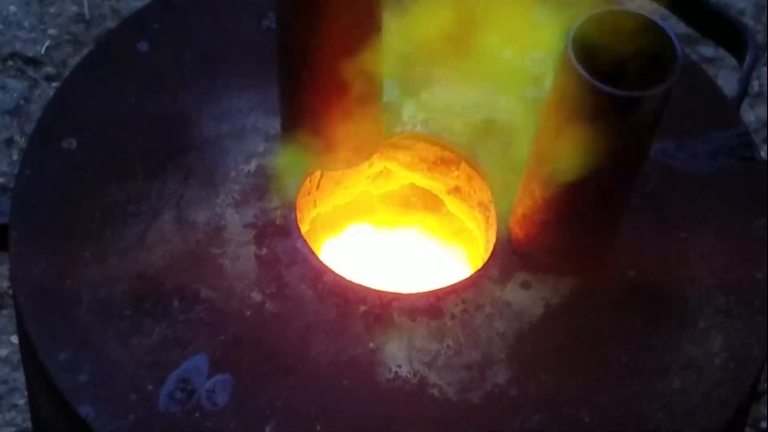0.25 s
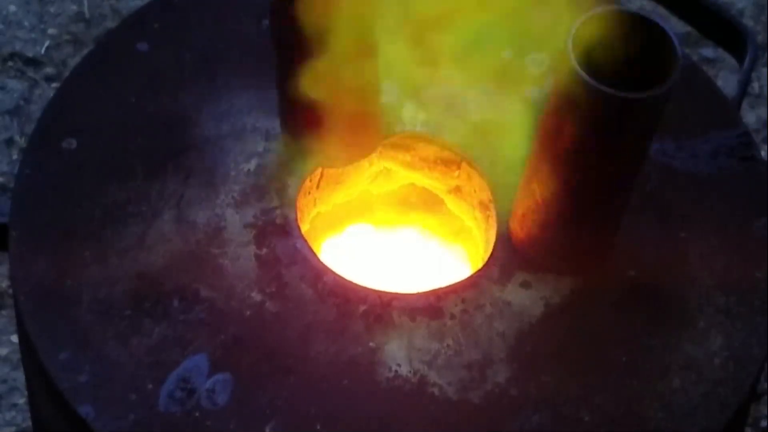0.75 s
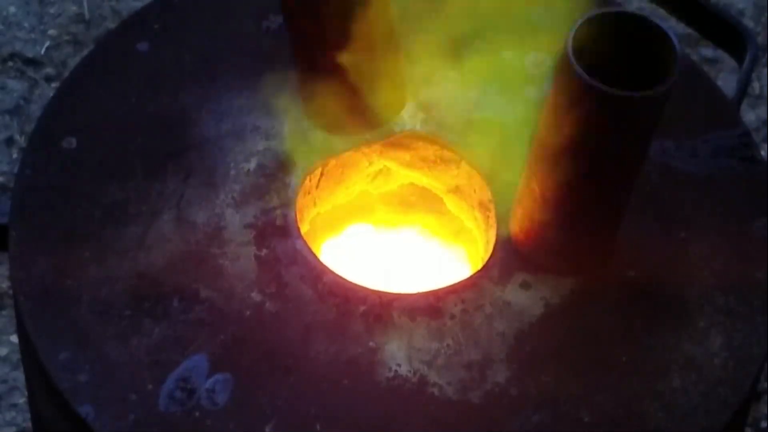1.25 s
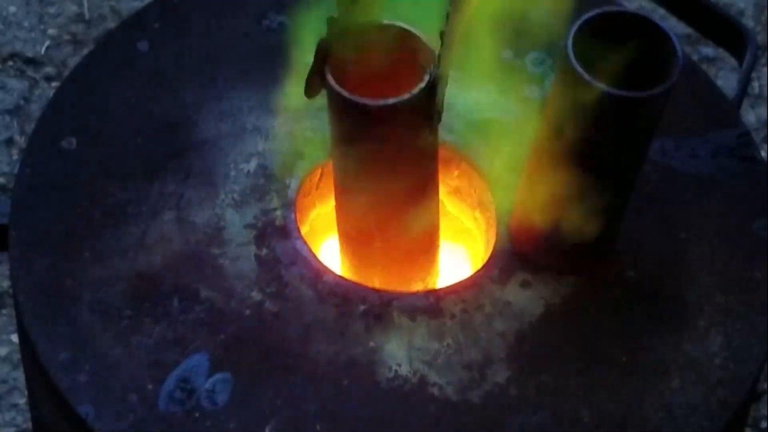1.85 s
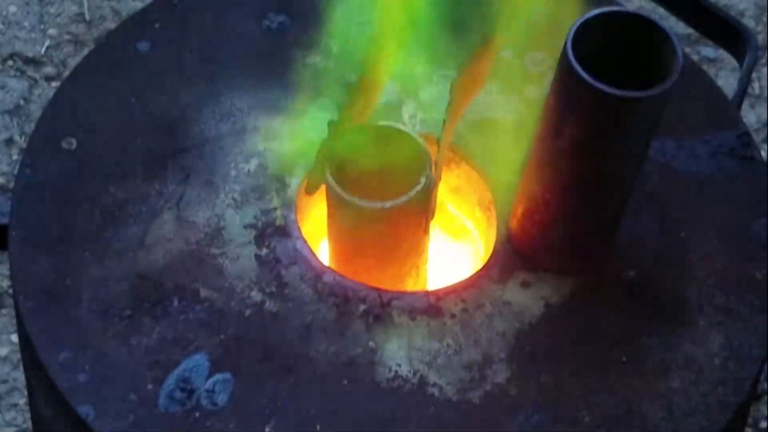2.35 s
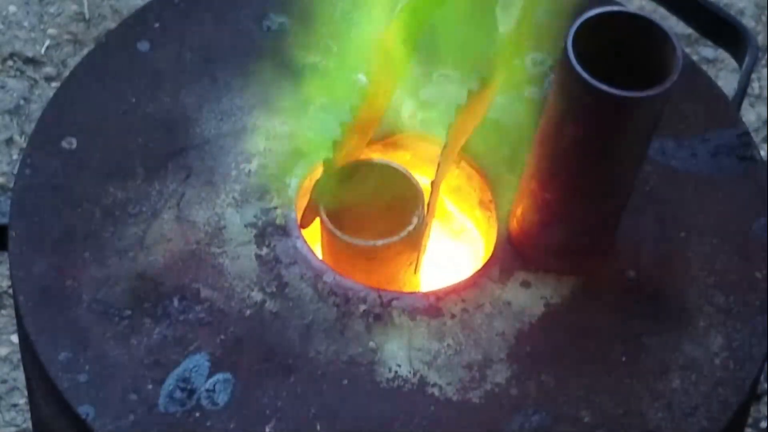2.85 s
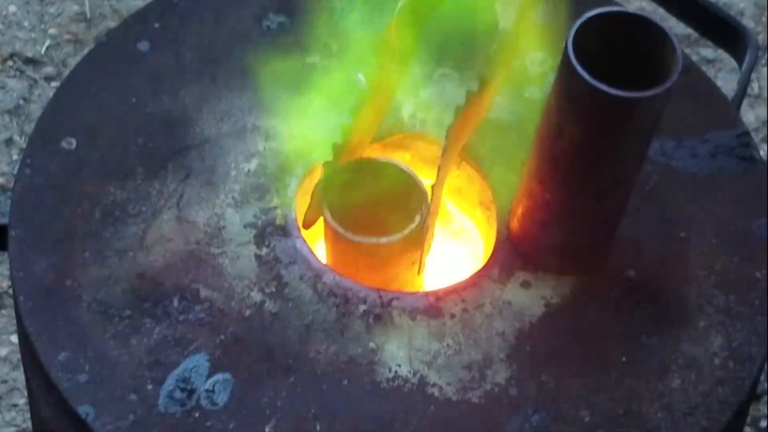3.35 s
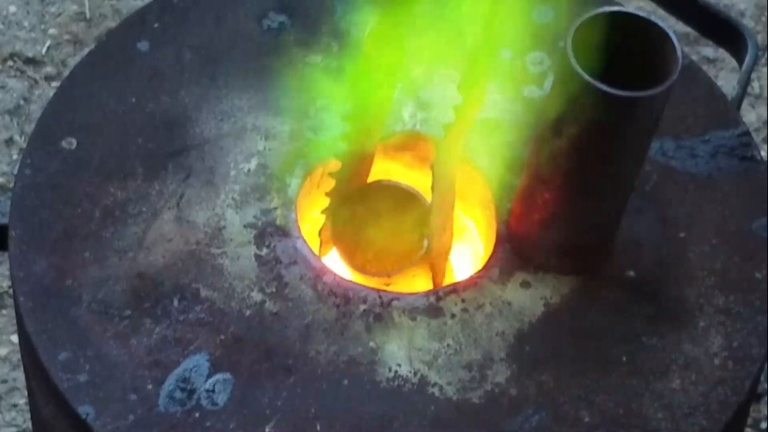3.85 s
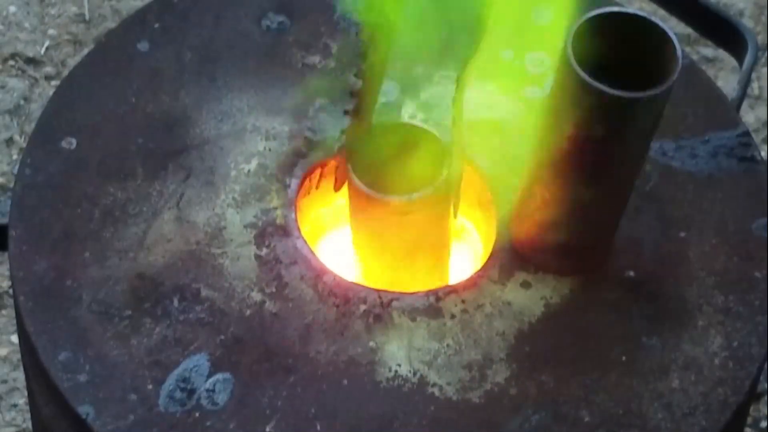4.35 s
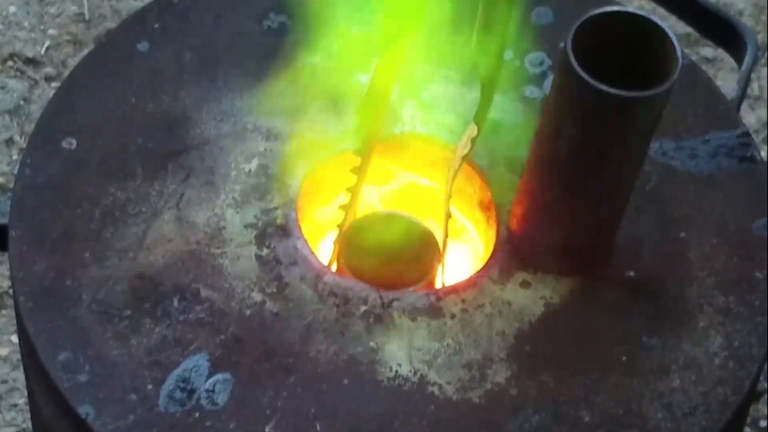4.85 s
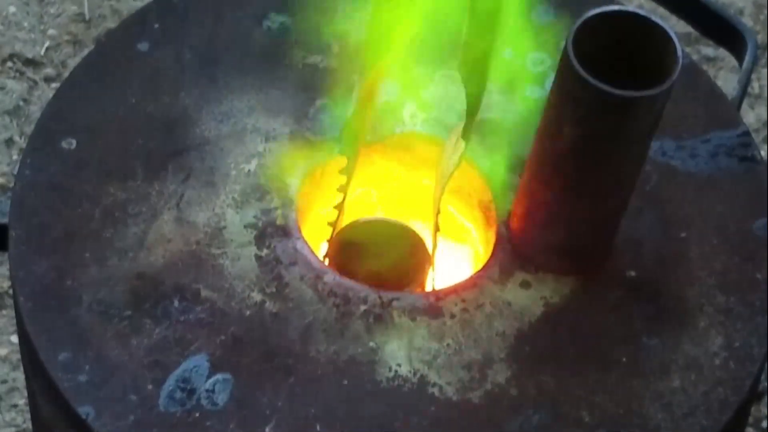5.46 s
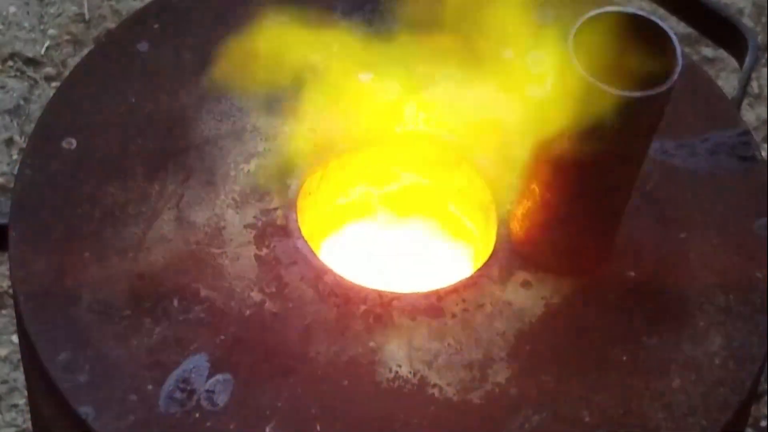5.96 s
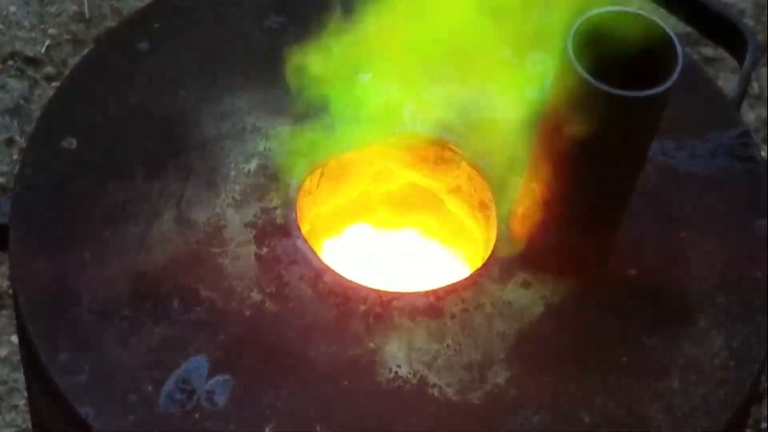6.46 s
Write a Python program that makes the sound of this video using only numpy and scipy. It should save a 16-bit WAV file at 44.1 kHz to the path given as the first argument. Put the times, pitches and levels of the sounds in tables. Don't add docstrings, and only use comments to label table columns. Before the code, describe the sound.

Deep, hollow flame rumble from a metal-melting furnace, wavering slightly as a pipe is lowered in, with a barely audible gas hiss above it.

```python
import sys
import numpy as np
from scipy import signal
from scipy.fft import rfft, irfft, next_fast_len
from scipy.io import wavfile
from scipy.ndimage import uniform_filter1d

SR = 44100
rng = np.random.default_rng(int(sys.argv[2]) if len(sys.argv) > 2 else 0)


def amp(db):
    return 10 ** (np.asarray(db, float) / 20)


def write(x):
    x = np.atleast_2d(x).T
    wavfile.write(sys.argv[1], SR, np.round(np.clip(x, -1, 1) * 32767).astype(np.int16))


N = 295911

# start_s, pressure_db
PRESSURE = [(0, -0.5), (.35, 0), (.9, 0), (1.45, -2), (1.8, -0.5), (2.1, 0), (2.5, 1.5), (2.85, 0),
            (3.5, 2.5), (3.8, -0.5), (4.15, 3.5), (4.5, 0.5), (4.95, 2), (5.2, 0), (5.85, 1), (6.2, 1.5),
            (6.5, 0), (6.7, 3)]
# start_s, depth_0_to_1
PIPE_DEPTH = [
    (0, 0.27),
    (1.2, 0.9),
    (1.8, 0.92),
    (5.7, 0.8),
    (6.05, 0.2),
    (6.7, 0),
]
# start_s, peak_db, pitch_hz
POPS = [(0.195, -48, 580), (0.509, -38, 563), (1.257, -34, 536), (1.309, -42, 530), (2.127, -39.5, 538),
        (2.235, -42, 548), (2.44, -40.5, 780), (3.121, -45, 506), (3.267, -44, 757), (4.701, -40, 487),
        (4.758, -43, 545), (6.456, -42, 570), (6.594, -41, 538)]


def read(points, hz, column=1):
    table = np.transpose(points)
    return np.interp(np.log(hz + 1), np.log(table[0] + 1), table[column])


def evened(x):
    return x / np.sqrt(np.mean(np.abs(x) ** 2) + 1e-20)


def curve(rows):
    return np.interp(np.arange(N) / SR, *np.transpose(rows))


def swells(rows):
    coarse_s = np.arange(0, N + 50, 50) / SR
    center_s, db, length_s = np.transpose(rows)
    bells = np.exp(-(2 * (coarse_s[:, None] - center_s) / length_s) ** 2)
    return np.interp(np.arange(N) / SR, coarse_s, bells @ db)


def flutter(depth_db, samples):
    wobble = rng.standard_normal(N)
    for _ in range(2):
        wobble = uniform_filter1d(wobble, int(samples))
    return amp(depth_db * evened(wobble))


def steadied(x, size, share):
    swing = uniform_filter1d(uniform_filter1d(x.mean(0) ** 2, size=size), size=size)
    x = x / (swing + 0.57) ** share
    return x / np.sqrt(np.mean(x.mean(0) ** 2))


def lifted(x, low_hz, high_hz, db):
    sos = signal.butter(2, [low_hz, high_hz], "band", fs=SR, output="sos")
    return x + signal.sosfiltfilt(sos, x) * (amp(db) - 1)


def resonances(modes, hz):
    mode_hz, width_hz, left_db, right_db = np.transpose(modes)
    shape = 1 / (1 + (2 * (hz[:, None] - mode_hz) / width_hz) ** 2) ** 1.333
    return np.array([shape @ amp(2 * left_db), shape @ amp(2 * right_db)])


def sided(points, hz):
    # pitch_hz, left_minus_right_db
    left_lean = [(60, 2.5), (110, -6.5), (200, -4.5), (380, -1), (700, -3), (1290, 0.5), (2380, -6),
                 (4400, -5), (8120, 5), (15000, -21)]
    lean_db = read(left_lean, hz) * np.array([[.5], [-.5]])
    return amp(2 * (read(points, hz) + lean_db))


def turbulence(power, size, patchy_db, flicker_db, patch_hz, patch_s):
    # pitch_hz, likeness_0_to_1, left_lead_rad
    port_likeness = [(40, .9, 0.5), (70.5, 1, -0.5), (201, 0.99, -0.15), (400, 1, -0.25), (457, 1, -0.5),
                     (508, 0.87, 0.7), (537, 0.95, -0.5), (600, 0.85, 0), (785, 0.95, 0.23), (930, 0.84, 0),
                     (1027, 0.2, -0.2), (1095, 1, -1), (1132, 0, -2.5), (1200, .68, -1), (1300, 0.4, -1),
                     (1380, 0.2, -0.7), (1440, .42, -1.5), (1520, 0.6, -0.2), (1575, 0.8, .5),
                     (1660, 0.92, 0.7), (1770, 0.6, 0.6), (1860, .4, -1.5), (1900, 0.2, -1.5), (2150, 0, -2.5),
                     (2270, .55, -3.5), (2364, .5, -6), (2450, 0.3, -6), (2580, 0.4, -5), (2730, 0, -6),
                     (2820, .12, -4), (2970, 0.47, -3), (3200, 0.46, -2),
                     (4000, 0.12, -2.5), (5760, 0.42, -5), (6130, .1, -2.5), (7600, 0.79, -2.5),
                  (9100, .15, -2.5), (10780, 0.97, 2), (12130, .3, 8), (14800, .45, 2.5),
                  (15500, 0.16, 3.5)]
    ports = port_likeness
    hop, hz = size // 4, np.fft.rfftfreq(size, 1 / SR)
    a, b, c, d, patches = rng.standard_normal((N // hop + 5, len(hz), 5), dtype=np.float32).T
    wide_bins = max(int(patch_hz * size / SR), 1)
    long_frames = max(int(patch_s * SR / hop), 1)
    for _ in range(2):
        patches = uniform_filter1d(uniform_filter1d(patches, wide_bins, axis=0), long_frames, axis=1)
    flicker = evened(uniform_filter1d(rng.standard_normal(a.shape[1]), long_frames))

    same = np.clip(read(ports, hz), 0, 1)[:, None].astype(np.float32)
    lead = np.exp(1j * read(ports, hz, column=2))[:, None].astype(np.complex64)
    right = a + 1j * b
    left = lead * (same * right + np.sqrt(1 - same ** 2) * (c + 1j * d))
    z = np.array([left, right])
    z *= np.sqrt(power(hz))[:, :, None] * amp(patchy_db * evened(patches) + flicker_db * flicker)
    out = signal.istft(z, nperseg=size, noverlap=size - hop)[1][:, :N]
    return out / np.sqrt(np.mean(out.mean(0) ** 2))


def tongs():
    # start_s, peak_db, center_hz, width_hz, t60_s
    ticks = [(5.34, -72, 15000, 3500, .15), (5.345, -73.5, 3980, 1600, 0.22), (5.34, -72, 7760, 1800, 0.19),
             (5.51, -69, 13700, 3000, .3), (5.748, -71, 4000, 820, .12), (5.762, -69, 3200, 300, .06),
             (5.76, -71, 6550, 250, .08), (5.762, -71, 5800, 1200, .06), (5.833, -61, 12900, 3500, .05),
             (5.785, -79, 4100, 200, .3), (5.86, -75, 4520, 160, .6), (6.8, -77, 4520, 160, .3),
             (5.5, -79, 4100, 200, .3), (6.22, -62, 12500, 3000, .06), (6.612, -72, 3300, 1100, .3),
             (6.63, -68.5, 2300, 700, 0.46), (8.2, -63, 2500, 1300, 0.44), (6.618, -63, 6860, 2500, .04)]
    out, t = np.zeros(N), np.arange(8000) / SR
    for start_s, peak_db, hz, width_hz, t60_s in ticks:
        pole = np.exp(-np.pi * width_hz / SR)
        grit = rng.standard_normal(len(t)) + 1j * rng.standard_normal(len(t))
        for _ in range(2):
            grit = signal.lfilter([1], [1, -pole], grit)
        band = evened((grit * np.exp(2j * np.pi * hz * t)).real)
        tick = amp(peak_db + 1.5 - 60 * t / t60_s) * band * np.minimum(t / 0.007, 1)
        part = out[round(start_s * SR):][:len(t)]
        part += tick[:len(part)]
    return out * amp([[-3.], [2.5]])


def puffs():
    edge_db, level_db, t60_s, attack_s = -14, -3.5, 0.053, 0.0024
    out, t = np.zeros(N), np.arange(3000) / SR
    for start_s, peak_db, hz in POPS:
        phase = 2 * np.pi * hz * t
        ring = np.sin(phase) + amp(edge_db) * np.sin(2.3 * phase) + .5 * np.sin(1.27 * phase)
        pop = amp(peak_db + level_db - 60 * t / t60_s) * np.minimum(t / attack_s, 1) * ring
        part = out[round(start_s * SR):][:len(t)]
        part += pop[:len(part)]
    return out * amp([[-2.], [1.7]])


def jet():
    # pitch_hz, width_hz, left_db, right_db
    tube_modes = [(2280, 176, -1.5, 4), (2820, 82, -10, -5), (2957, 60, -6, -1), (3105, 45, -4, -6),
                  (3260, 100, -13, -7.5), (3410, 100, -11, -10), (3720, 120, -16, -14),
                  (3950, 140, -13, -6), (4350, 50, -16, -9), (4513, 60, -6, -1), (5080, 120, -13, -7.5),
                  (7390, 190, -12, -13), (7660, 360, -24, -12.5), (8220, 430, -19, -11.5),
                  (9130, 660, -16, -11)]
    # pitch_hz, width_hz, left_db, right_db
    end_modes = [(5753, 450, -16, 13), (6150, 530, -8.5, 1.5)]
    # pitch_hz, width_hz, left_db, right_db
    whistle_modes = [(11180, 89, -5, 5), (11250, 320, -10, -5)]
    # pitch_hz, width_hz, left_db, right_db
    nozzle_modes = [(9840, 330, -11, -18), (10400, 100, -11, -19), (10940, 300, -14, -13),
                    (11300, 700, -10, -17), (12500, 980, -12, -11.5), (12960, 140, -9, -5),
                    (13560, 200, -9, -9), (14710, 180, -5, -8), (15620, 250, -5, -6),
                    (15000, 2200, -4.5, -16), (15300, 130, -6, -13)]
    # start_s, lift_db, length_s
    flares = [(.38, 2, .1), (.85, 6, .06), (1.8, 8, .04), (2.45, 4, 0.13), (2.68, 9, 0.055), (3.03, 6, .05),
              (3.6, 7, .1), (4.15, 7.5, 0.19), (4.75, 6.5, 0.12), (4.98, 7, 0.056), (5.33, 3, .06),
              (5.43, 4, 0.13), (5.51, 13.5, 0.067), (6.22, 11, 0.086)]
    # start_s, loss_db, length_s
    shades = [
        (1.4, 2, .2),
        (2.81, 4, 0.092),
        (5.35, 7, 0.51),
    ]
    # start_s, loss_db, length_s
    gutters = [(.15, -0.5, .15), (.62, 2, .18), (1.45, 1, .25), (1.15, -1, .06), (2.08, 6, .07),
               (2.5, 3, .12), (3.75, 2, 0.054), (4.97, 0, .1), (5.25, 5.5, .08), (6.35, 2, 0.055),
               (6.5, 1, .06)]
    # start_s, loss_db, length_s
    lulls = [(.15, 3, .12), (.62, 7, .16), (.76, 4, .07), (1.15, 4, .06), (1.27, 4, .05), (1.47, 4, .15),
             (2.08, 5, .06), (2.5, 6, .13), (3.75, 6, .06), (5, 4, .08), (5.25, 5, .07), (6.15, 3, .06),
             (6.35, 6, .05), (6.5, 5, .06)]

    def hiss(modes, bed_db, low_hz, high_hz):
        bed = amp(2 * np.array(bed_db))[:, None]

        def power(hz):
            top = resonances(modes, hz) + bed / (1 + (hz / high_hz) ** 12)
            return top / (1 + (low_hz / (hz + 1)) ** 12)
        return power

    grain = dict(size=1024, patchy_db=1.06, flicker_db=0.36, patch_hz=400, patch_s=.04)
    tube = turbulence(hiss(tube_modes, (-18, -13.5), 2230, 7000), **grain)
    tube_end = turbulence(lambda hz: resonances(end_modes, hz), **grain)
    whistle = turbulence(lambda hz: resonances(whistle_modes, hz), **grain)
    fizz = turbulence(hiss(nozzle_modes, (-16, -18.5), 10600, 17000), **grain)

    surge_db = curve(PRESSURE)
    glint = signal.sosfiltfilt(signal.butter(4, 6700, "high", fs=SR, output="sos"), tube)
    glint_db = 0.5 * curve(PIPE_DEPTH) + 0.44 * surge_db - swells(gutters)
    tube = tube + glint * (amp(glint_db) - 1)
    tube = amp(-78 + 0.84 * surge_db) * lifted(tube, 6900, 7700, .7 - swells(lulls))
    tube_end = amp(-80.5 + 1.6 * surge_db - swells(shades)) * flutter(0.78, 2500) * tube_end
    whistle = whistle * amp(-82.5 + 0.37 * surge_db + swells(flares)) * flutter(1.1, 1800)
    return tube + tube_end + whistle + amp(-74.5 + 0.65 * surge_db) * fizz


def mouth():
    # pitch_hz, density_db_per_hz
    spill_spectrum = [(380, -27), (480, -3), (600, -7), (700, -10.5), (900, -9.5), (960, -12.5),
                      (1005, -23.5), (1050, -18), (1150, -17), (1450, -16.5), (1720, -27.5), (1800, -32),
                      (2000, -46), (2300, -53)]
    # pitch_hz, width_hz, left_db, right_db
    hollow_modes = [(543, 73, -3.5, 2), (745, 143, -12.5, -9), (1090, 44, -7.5, -6.5)]
    # pitch_hz, width_hz, left_db, right_db
    ring_modes = [(1232, 122, -2, -0.5), (1310, 38, -14, 5)]
    # pitch_hz, width_hz, left_db, right_db
    throat_modes = [(1570, 80, -5.5, 1), (1671, 32, -0.5, 1)]
    # start_s, choke (0 open, 1 choked, may go slightly beyond)
    choke_rows = [(0, 0.41), (.55, 0), (.9, 0.07), (1.4, 0.12), (1.65, -.15), (1.95, -.25), (2.1, 0.48),
                  (2.5, 0), (2.85, 0.5), (3.6, 0.33), (4, 0.68), (4.5, 0.08), (4.8, 0.16), (5.1, 1.15),
                  (5.3, 1), (5.75, 0.78), (6.1, 0.48), (6.7, 0.54)]

    grain = dict(size=4096, patchy_db=1.0, flicker_db=.5, patch_hz=146, patch_s=.12)
    spill = turbulence(lambda hz: sided(spill_spectrum, hz) + resonances(hollow_modes, hz), **grain)
    ring = turbulence(lambda hz: resonances(ring_modes, hz), **grain)
    throat = turbulence(lambda hz: resonances(throat_modes, hz), **grain)

    choke = curve(choke_rows)
    blocked = choke + .5 * curve(PIPE_DEPTH) + swells([(2.2, .8, .4)])
    spill = lifted(spill, 975, 990, 7.5 - 6 * blocked)
    throat = throat * amp(-70.5 + 0.5 * choke + 0.86 * curve(PRESSURE)) * flutter(1.3, 3000)
    ring = amp(-63.5 - 14.5 * choke) * flutter(0.48, 2100) * ring
    return amp(-54.5 - 3.5 * choke) * spill + ring + throat


def boom():
    # pitch_hz, density_db_per_hz
    boom_spectrum = [(12, -72), (20, -52), (37, -44), (81, -11), (155, -7), (219, 0.5), (264, 0.5),
                     (301, -8), (368, -9), (480, -21), (620, -65), (1060, -120)]
    # pitch_hz, width_hz, left_db, right_db
    low_modes = [(93.6, 7.5, -9.5, -18), (183, 2.1, -2.5, -3.5), (213.5, 10.3, 0.5, 3), (277, 22, -9, -19)]
    # pitch_hz, width_hz, left_db, right_db
    upper_modes = [(282.6, 48, -2, 0), (369, 50, -1.5, 1.5), (427, 36, -6.5, -13)]
    # start_s, sag_db, length_s
    stumbles = [(.1, 0.5, 0.035), (.3, 0, 0.027), (.58, 3, 0.13), (1.25, 1, 0.1), (1.8, 2.5, 0.039),
                (2.12, 5.5, 0.049), (2.5, 8.5, 0.037), (2.68, 7, 0.045), (3.02, 6, 0.059), (3.5, 12, 0.029),
                (3.62, 9, 0.028), (4.47, -0.5, 0.039), (4.82, 4, 0.12), (4.95, 6.5, 0.073),
                (5.09, -2.5, 0.041), (5.5, 10.5, 0.066), (5.77, 7.5, 0.056), (6.15, 2, 0.46),
                (6.35, -1.5, 0.064), (1.1, 5, .05)]
    # start_s, lift_db, length_s
    deep_swells = [(.05, -5, 0.19), (.55, 3.5, 0.37), (.9, -2.5, 0.19), (1.05, -1, 0.073), (1.6, -1, 1),
                   (2.45, 1, .15), (2.68, 7.5, 0.076), (2.92, 3, 0.5), (3.35, -3.5, 0.22), (3.6, 2.5, 0.19),
                   (3.93, -4, 0.15), (4.1, 2.5, 0.098), (4.25, -3, 0.074), (4.4, 1, 0.18), (4.9, 2, 0.25),
                   (5.5, 4, .12), (5.7, -5, .12)]
    # start_s, upward_lean_db
    ridge = [(0, 4.5), (.25, -0.5), (.55, 3), (.9, 2.5), (1.05, 0.5), (1.3, 6), (1.65, 2), (1.85, -1.5),
             (2.1, 0.5), (2.5, 0), (3, 3), (3.45, -2), (4.2, 0.5), (4.85, -3.5), (5.2, 0), (5.6, -3),
             (6.25, 1), (6.7, 1.5)]
    # start_s, lift_db, length_s
    upper_swells = [(.35, 3.5, .3), (.8, 4, 0.16), (1.35, -5, 0.14), (1.72, -7, 0.17), (2.4, -7.5, 0.14),
                    (2.75, -2, 0.17), (3.35, -9, 0.11), (3.75, -4, 0.29), (4.4, 4, 0.14), (4.65, -1, .08),
                    (5.1, 4, 0.2), (5.35, -7, .08), (5.75, 3, 0.22), (6.25, 1.5, 0.24)]
    # start_s, lift_db, length_s
    licks = [(.1, 2, 0.17), (.93, 6.5, 0.15), (1.15, 2, 0.12), (2, 6.5, 0.1), (3.2, 2.5, 0.23),
             (4.6, 0.5, 0.23), (5.3, 2, 0.17), (5.9, 2, 0.12), (6.2, 2.5, 0.33)]

    grain = dict(size=4096, patchy_db=0.33, flicker_db=0.57, patch_hz=60, patch_s=.15)
    low = turbulence(lambda hz: sided(boom_spectrum, hz) + resonances(low_modes, hz), **grain)
    upper = turbulence(lambda hz: resonances(upper_modes, hz), **grain)
    low = steadied(low, size=2500, share=.35)
    low = steadied(low, size=250, share=.27)
    upper = steadied(upper, size=2000, share=.4)

    sag_db, lean_db = swells(stumbles), curve(ridge)
    low = lifted(low, 55, 150, swells(deep_swells))
    low = lifted(low, 230, 310, lean_db) * amp(-.5 * lean_db)
    upper_db = -46.5 + 1.02 * sag_db + 0.35 * curve(PRESSURE)
    upper_db = upper_db - 2 * curve(PIPE_DEPTH) + .5 * lean_db + swells(upper_swells)
    upper = upper * amp(upper_db) * flutter(0.2, 2500)
    roar = lifted(amp(-36 - sag_db) * low + upper, 268, 337, swells(licks))

    cap_db, cap_share = -31.5, .7
    crest = uniform_filter1d(uniform_filter1d(roar.mean(0) ** 2, size=150), size=150) / amp(2 * cap_db)
    roar = roar / (1 + crest ** 2) ** (cap_share / 4)
    return signal.sosfilt(signal.butter(1, 45, "high", fs=SR, output="sos"), roar)


def lid(x):
    # pitch_hz, width_hz, left_db, right_db
    ripple = [(115.3, 12, -0.5, -5.5), (147, 20, 0.5, 1), (166, 15, -1, -1), (296.4, 15, -3, -1.5),
              (332, 26, -3, -0.5), (98, 16, -1, -1.5), (367.7, 14, 1.5, 1), (538, 20, 0.5, 2),
              (562, 16, -0.5, -1), (382.7, 11, -5, -4), (430, 15, 0.5, -4.5), (506.5, 33, -7, -0.5),
              (580, 45, -3.5, -2), (630, 14, 2.5, 0.5), (659, 15, -12.5, -3), (860, 50, 1, -1),
              (934, 46, 1, -1.5), (1056, 27, 4, -3.5), (1052, 17, -6, -4), (1150, 9.9, -2, 0),
              (1225, 52, -10, 3), (1275, 36, -1.5, 0), (1303, 13, -8, -5.5), (1340, 22, -5.5, 0),
              (1510, 19, 0, -1), (1460, 14, -8, 5), (1590, 16, 0, -1), (1716, 28, 2, 2), (1790, 20, -4, 0),
              (1800, 14, -1, 2), (1910, 50, 0.5, -1.5)]
    size = next_fast_len(N)
    hz, coarse_hz = np.fft.rfftfreq(size, 1 / SR), np.arange(0, 2400.)
    center_hz, width_hz, left_db, right_db = np.transpose(ripple)
    shape = np.exp(-(2 * (coarse_hz[:, None] - center_hz) / width_hz) ** 2)
    gain_db = [np.interp(hz, coarse_hz, shape @ db) for db in (left_db, right_db)]
    return irfft(rfft(x, size) * amp(gain_db), size)[:, :N]


def scene():
    # start_s, lift_db, length_s
    rim_swells = [(.1, 0, 0.42), (.55, 5, 0.071), (.85, -4, 0.12), (1.2, 2, 0.27), (1.6, -4, .4),
                  (2.15, 0, 0.11), (2.6, -1, .2), (2.85, -2, 0.35), (3.35, -2, 0.11), (3.95, 2, .1),
                  (4.15, 1.5, 0.27), (4.65, -1, 0.087), (5.35, -2.5, 0.62), (6, 3, 0.2)]
    # start_s, lift_db
    skirt = [(0, -2), (.5, -0.5), (1, -3.5), (1.6, -1.5), (1.75, 0.5), (2.1, -3), (2.35, -3.5), (2.7, 2),
             (4.2, 0.5), (4.45, -2), (4.7, 1.5), (6.7, 0)]
    hush_s, depth_db = 0.0071, 3
    hush_db = swells([(start_s - hush_s / 2, depth_db, hush_s) for start_s, _, _ in POPS])
    shake = flutter(1.04, 500)
    flame = boom() + shake * mouth() * amp(-hush_db)
    flame = lifted(flame, 424, 660, swells(rim_swells) - hush_db)
    gas = lid(flame) + shake ** 0.7 * flutter(0.9, 1500) * jet()
    gas = lifted(gas, 1660, 2250, curve(skirt))
    return gas + puffs() + tongs()


def band_limit(x):
    return signal.sosfilt(signal.butter(12, 16040, fs=SR, output="sos"), x)


def record(dry):
    edge_hz = 15720
    hz, _, z = signal.stft(dry, SR, nperseg=2048, boundary="even")
    power = uniform_filter1d(uniform_filter1d(np.abs(z) ** 2, size=5, axis=1), size=3, axis=2)
    near_db = 10 * np.log10(power + 1e-20)
    treble = (hz > 1800) & (hz < edge_hz)
    faint_db = np.percentile(near_db[:, treble], 2.6, axis=(1, 2), keepdims=True)
    keep = np.where(treble[:, None], np.clip(near_db - faint_db, .05, 1), 1)
    kept = signal.istft(z * keep * (hz < edge_hz)[:, None], SR, nperseg=2048)[1][:, :N]
    return band_limit(kept)


dry = scene()
out = record(dry)
write(out)
```